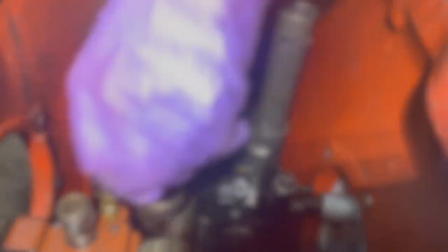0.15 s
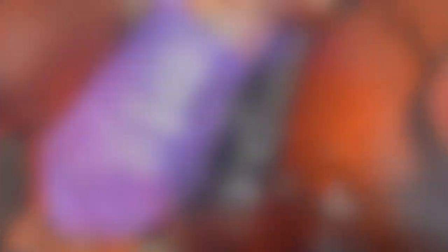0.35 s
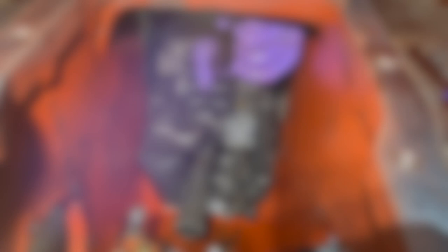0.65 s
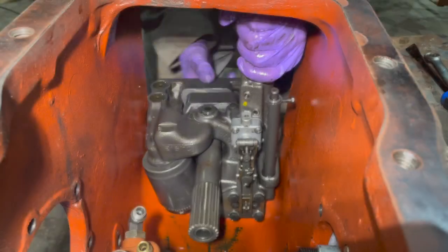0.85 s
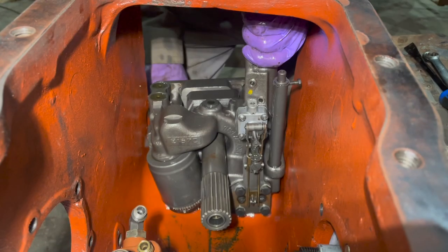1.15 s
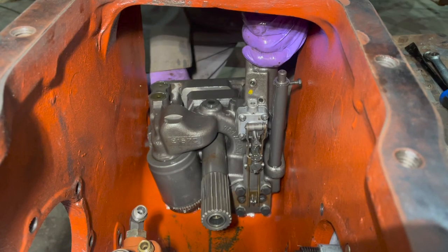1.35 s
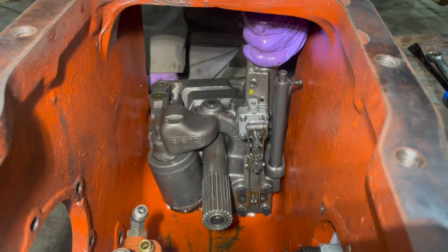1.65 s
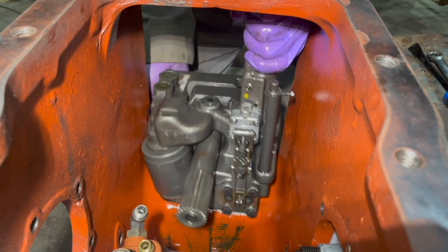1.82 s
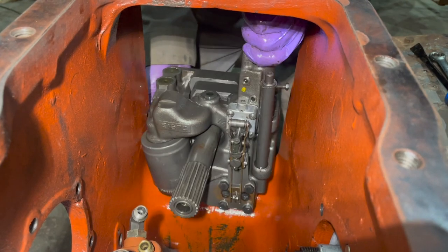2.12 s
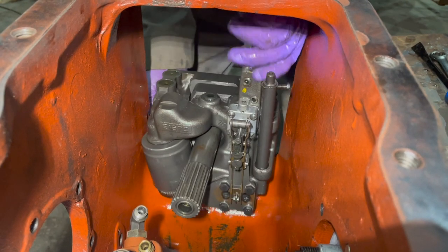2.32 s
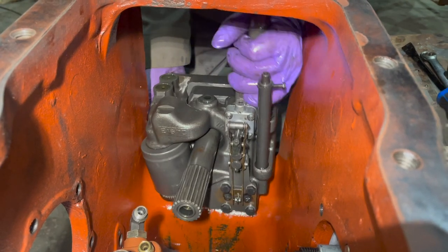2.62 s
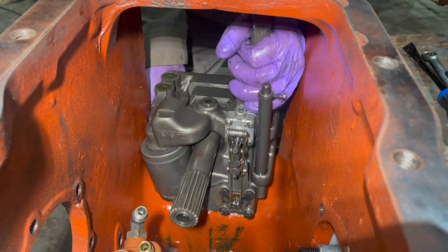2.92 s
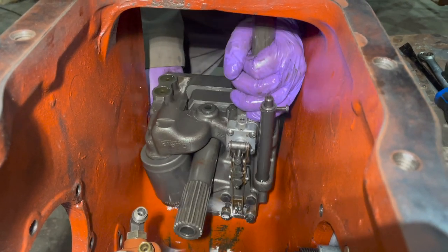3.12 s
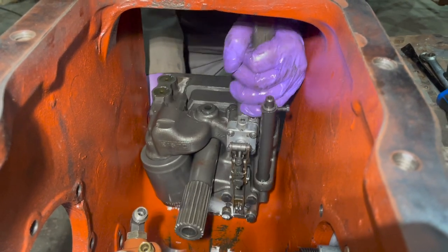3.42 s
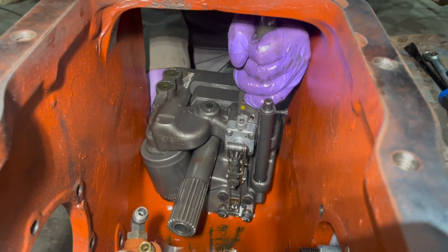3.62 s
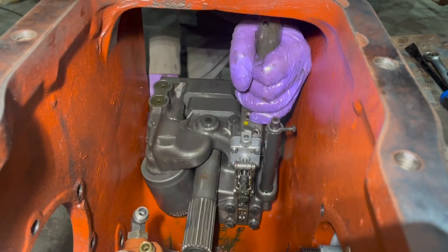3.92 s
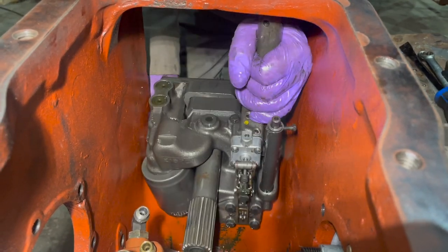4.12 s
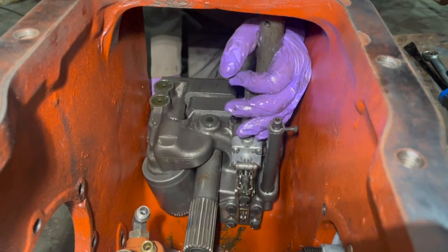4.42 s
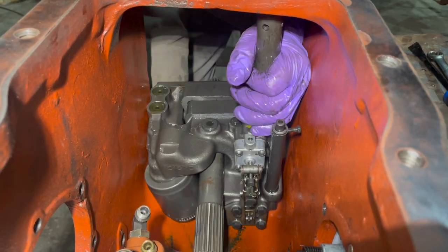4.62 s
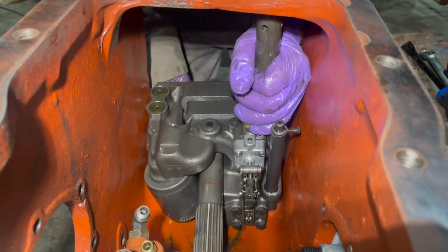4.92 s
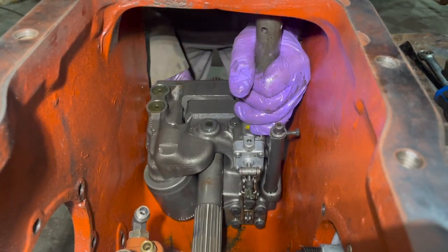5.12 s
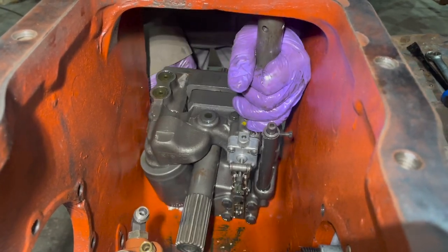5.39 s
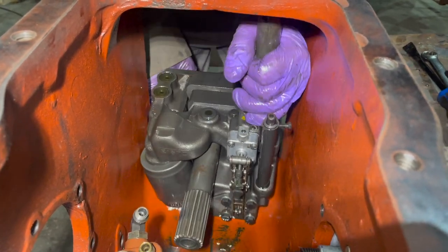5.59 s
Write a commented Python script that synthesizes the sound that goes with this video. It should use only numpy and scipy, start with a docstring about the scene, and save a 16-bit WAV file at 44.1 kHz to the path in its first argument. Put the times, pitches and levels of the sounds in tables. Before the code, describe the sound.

Close stereo microphones catch a heavy cast gear pump being rocked inside a steel housing in a workshop. Small knocks come in a quick cluster, then spaced clunks and clanks, the hardest near three and a half and just past five seconds. Gritty scuffs, glove rubbing and short rubber squeaks fill between, over a low drone and rumble with a short hall tail.

```python
"""Knocks of a heavy cast gear pump, rocked loose inside a steel housing in a workshop: damped modes of
casting and housing ring, under cracks of dying noise. Friction noise and grit make the scuffs, wavering
sines the rubber squeaks, coloured noise the rubbing gloves, the dragging casting, the housing's drone
and a low rumble that swells with some of the knocks. The hall adds a noise tail; two close microphone
ports differ in phase."""
import sys
import numpy as np
from scipy import signal
from scipy.fft import rfft, irfft, next_fast_len
from scipy.io import wavfile
from scipy.ndimage import uniform_filter1d

SR = 44100
rng = np.random.default_rng(int(sys.argv[2]) if len(sys.argv) > 2 else 0)


def int16_out(signal):
    """Quantize to a 16-bit WAV file."""
    q = np.round(np.clip(np.atleast_2d(signal).T, -1, 1) * 32767)
    wavfile.write(sys.argv[1], SR, q.astype(np.int16))


N = 253575

# Knocks. Each row: main touch in seconds, boom dB at 150 Hz, wall dB at 450 Hz, clunk dB at 750 Hz,
# ring dB at 1.5 kHz, clank dB at 2.8 kHz, favoured low mode in Hz, favoured high mode in Hz,
# left-right lean in dB, then any further raised or lowered modes as (Hz, dB).
KNOCKS = [(0.216, -35, -33, -37, -34, -44.5, 587, 1140, 4, (1356, 6), (599, 4)),
          (0.345, -29, -21, -24.5, -37.5, -39, 780, 1050, -4, (599, 4)),
          (0.401, -52, -30, -35, -40, -47, 540, 2512, -2),
          (.478, -17, -29, -12, -31, -35, 680, 1356, 11, (792, 7), (872, 8), (1742, 6), (3050, 6)),
          (.545, -36, -38, -29, -40, -47, 655, 1093, 8),
          (0.561, -29, -35, -31, -31, -48, 444, 1140, 3, (1138, 13), (998, -8), (1465, -6)),
          (0.685, -20, -17.5, -22, -30, -50, 790, 1150, 8, (444, 8), (680, 6), (599, -8), (872, 5)),
          (0.795, -45, -31, -38, -42, -57, 525, 956, 14),
          (.81, -32, -38.5, -60, -42, -48, 674, 1356, 16, (2775, 8)),
          (0.843, -41, -38, -55, -38, -37.5, 546, 2775, 4, (1356, 6), (1742, 6), (4240, 8), (3050, -8)),
          (1.099, -27, -18, -20, -21, -20.5, 607, 1470, 7.5, (1465, 8), (2085, -8), (2290, 5), (4240, 12),
          (4920, 6), (3768, -8), (792, -14), (1356, -8), (1138, -4), (860, 8), (1600, 6), (1742, -8),
          (2450, 8), (3050, 3), (3250, 6)),
          (1.522, -29.5, -22.5, -31.5, -18, -27, 603, 1460, 2.5, (1620, 8), (1465, 4), (1742, 8), (2450, 9),
          (1050, -6), (2085, -6), (2512, -6), (3250, 5)),
          (1.767, -19, -21, -5, -23.5, -19, 675, 998, 11.5, (792, 6), (1138, 8), (1356, 6), (880, 5),
          (1742, 6), (2450, 8), (3050, 6), (2085, -8)), (1.775, -40, -24, -12, -30, -34, 675, 1742, 8),
          (1.788, -40, -28, -26, -33, -50, 792, 880, 4, (1138, 6)),
          (1.859, -19.5, -19.5, -22, -30, -41, 790, 1142, 1, (1138, -6), (1356, 4), (2512, -6)),
          (1.951, -19.5, -27, -54, -48, -58, 570, 1050, -2),
          (2.035, -16.5, -31, -34, -48, -44, 513, 1136, 1),
          (2.179, -13, -17, -13, -22, -31, 680, 1030, -3, (467, 8), (220, 6), (379, -14), (1138, 5),
          (2085, 4)), (2.208, -20, -29.5, -45, -30, -35, 544, 1465, 12),
          (2.267, -27, -48, -39, -34, -43, 526, 1480, 6),
          (2.619, -20, -17.5, -11, -14, -20.5, 590, 1365, 9, (1356, 1), (379, -7), (792, 9), (1720, 5),
          (2290, 7), (2780, 8), (3290, 5), (2085, -8), (680, -10)),
          (2.678, -45, -45, -50, -43, -58, 680, 1356, 5), (2.797, -27, -43, -48, -61, -43, 600, 2512, 3),
          (2.861, -27, -29, -46.5, -51, -52, 680, 1340, 5),
          (3.112, -27.5, -43, -47, -51, -56, 680, 1356, -5),
          (3.443, -14.5, -7, -10.5, -18, -15, 680, 1145, 4, (998, 10), (2450, 6), (3265, 9), (792, 9),
          (467, 4), (2290, 6), (1535, 4), (2085, -6), (3768, 5), (4240, 3)),
          (3.61, -37, -56, -41, -47, -43, 680, 4240, -4, (2085, -8), (3768, 6), (6150, 8), (5146, 5)),
          (3.647, -25, -26, -30, -32, -20, 680, 3950, -4, (2085, -10), (2512, -5), (3050, -5), (3768, 10),
          (4240, 12), (5146, 12), (6150, 14), (7060, 12)),
          (3.654, -40, -40, -32, -28, -25, 792, 2775, -2, (2085, -10), (3413, 6), (3768, 8), (1465, 6)),
          (3.666, -40, -30, -30, -35, -36, 792, 1535, 0, (3768, 8), (5146, 8)),
          (3.839, -18, -19, -23, -26, -35, 544, 1330, 5.5, (444, -10), (830, 8), (2700, 6), (1465, -8),
          (2450, -8)), (4.433, -30, -43, -39, -47, -58, 600, 1535, 8),
          (4.606, -27, -46, -39, -51, -62, 613, 1000, 10), (4.743, -40, -42, -40, -50, -66, 792, 1138, 6),
          (4.829, -27, -35, -33, -45, -66, 550, 1000, 4, (998, 6), (1356, 4)),
          (5.172, -27, -18, -18, -19, -19, 700, 2520, 12, (1600, 8), (2450, 6), (2620, 8), (379, 8),
          (3768, 10), (4920, 8), (5600, 6)), (5.18, -14.5, -7.5, -13, -19, -18.5, 680, 1137, 2, (1010, 10),
          (1138, -2), (1610, 6), (2775, 6), (792, -6), (880, 6), (2620, 9), (3250, 7)),
          (5.259, -29, -30, -30, -40, -48.5, 590, 1000, 15),
          (5.388, -33, -38, -68, -55, -57, 520, 1350, 12), (5.487, -40, -38, -37, -43, -51, 792, 1356, 15),
          (5.523, -40, -49, -35, -40.5, -46.5, 544, 1170, 0)]
# Modes of casting and housing. Each row: frequency in Hz, level in dB, free t60 in seconds, left-right in dB.
BODY_MODES = [(71.6, -16, 0.4, 3.5), (97.95, -6.5, 0.96, -13.5), (130.7, 2, 0.22, 0), (183.5, 7.5, 0.5, 8),
              (220, 0, .55, -12), (298.2, -1, 0.17, -10), (378.6, -6, 0.49, 7), (444.4, -1, 0.5, 8),
              (467, 4, 0.23, -2.5), (544, 2.5, 0.018, -23), (599, 4, 0.07, 13.5), (679.6, 2, 0.088, 4),
              (792, -2.5, 0.095, 10), (872, -6, 0.05, 3), (998, -5, 0.089, 8), (1050, -3, .06, 0),
              (1138, -1, 0.12, 2), (1356, 2, 0.098, -6.5), (1465, -6, .05, 5), (1535, 0, 0.03, 5),
              (1610, -6, .04, 5), (1742, -6, 0.096, 7), (2085, 4.5, 0.02, -23), (2290, -1, .05, 0),
              (2376, -11.5, 0.08, -6), (2450, -1, .04, 5), (2512, 2, 0.053, -5.5), (2620, -2, 0.041, -8),
              (2775, -1, 0.04, 5), (3050, 2, 0.032, 18.5), (3265, -5, 0.05, -11.5), (3413, -10, .05, 3),
              (3768, -10, .05, 3), (3950, -8, 0.02, 0), (4240, -5.5, 0.04, 6), (4920, -8, .03, 3),
              (5146, -10, .05, 3), (5600, -8, 0.03, 0), (6150, -8, 0.035, 0), (7060, -10, .03, 0)]
# Share of a knock's lean that reaches each frequency. Each row: Hz, share.
LEAN_SHARE = [(70, .05), (200, 0.15), (450, 0.36), (700, 0.54), (1500, 0.43), (4000, 0.34), (7500, 0.42)]
# Dense modes heard as dying noise. Each row: Hz, t60 in seconds.
CRACK_T60_S = [(100, 0.13), (300, 0.063), (700, 0.13), (2500, .035), (11000, 0.07)]
# That noise against the knock's colour. Each row: Hz, dB.
CRACK_DB = [(150, -14.5), (300, 1), (450, -3.5), (700, -11), (1500, -9), (2000, -9), (3000, -7), (5000, -6),
            (11000, -6)]
# Scuffs, the part or a glove slipping a little. Each row: start in seconds, length in ms (to -20 dB),
# level in dB ahead of the low-pass, centre in Hz, width in octaves.
SCUFFS = [(.29, 112, -47, 2960, 2.4), (.345, 69, -43, 2100, 0.62), (.362, 30, -35.5, 3950, 0.55),
          (.399, 45, -46, 2000, 1.1), (.53, 40, -49, 2800, .9), (.635, 60, -46, 1500, 1.2),
          (.674, 25, -40, 1800, .6), (.795, 12, -46, 2500, 2.5), (.893, 15, -47, 2500, 1.2),
          (.86, 19, -43, 6030, 2.4), (1.50, 136, -49, 5860, 1.7), (1.675, 60, -53, 4500, 1.6),
          (1.692, 14, -46, 4200, 1.4), (1.75, 18, -47, 2200, .8), (1.856, 38, -42, 2800, 0.7),
          (1.856, 20, -47, 5000, .3), (2.14, 130, -45, 1450, 0.45), (2.18, 45, -36, 2050, 0.3),
          (2.268, 20, -41, 2500, 1.6), (2.335, 77, -33.5, 1990, 1.1), (2.796, 26, -37, 3600, 1),
          (2.80, 73, -42.5, 1230, 0.78), (3.102, 15, -47, 3000, 1.2), (3.112, 40, -39.5, 3760, 0.4),
          (3.11, 96, -38.5, 1020, 0.83), (3.24, 77, -55, 3000, 3.5), (3.355, 31, -46.5, 3950, 1.3),
          (3.47, 30, -40, 2800, .8), (3.405, 170, -46.5, 4720, 3.5), (3.555, 50, -52, 3200, 1.5),
          (3.606, 45, -39, 3600, 1.4), (3.649, 40, -30, 3600, 1.3), (3.76, 25, -46, 2000, 1.2),
          (3.845, 25, -40, 2500, 1.5), (3.788, 14, -39, 6500, 0.95), (4.33, 84, -40.5, 2920, 3.7),
          (4.46, 41, -47.5, 5000, 1.3), (4.51, 70, -48, 1000, .7), (4.64, 118, -45.5, 4350, 2.9),
          (4.70, 57, -50, 1500, 0.95), (5.215, 42, -47, 2800, 4.2), (5.488, 35, -40.5, 1370, 0.46)]
# Scuff hiss before its band-pass. Each row: Hz, dB per Hz.
FLAT_COLOUR = [(20, 0), (20000, 0)]
# Rubber on oily steel. Each row: start in seconds, level in dB before flicker, mean pitch in Hz, length in ms.
SQUEAKS = [(1.025, -53, 2800, 65), (2.22, -36, 3150, 40), (2.224, -50, 5600, 35), (2.335, -45, 3550, 18),
           (2.415, -50, 3600, 35), (.695, -52, 3800, 35), (.70, -50, 2500, 40), (1.696, -49, 4500, 20),
           (2.8, -47, 2500, 38), (3.118, -48, 3600, 45), (3.575, -55, 2400, 35), (4.188, -54, 2880, 65)]
# Gloves rubbing on the metal. Each row: time in seconds, level in dB.
RUB_LEVEL_DB = [(0, -54), (.2, -58), (.35, -55), (.46, -62.5), (.74, -66), (.8, -54), (.88, -53),
                (.93, -66), (1.1, -65), (1.3, -56), (1.55, -58), (1.62, -68), (1.7, -57), (1.8, -68),
                (1.95, -82), (2.16, -50), (2.44, -39), (2.51, -50), (2.59, -46), (2.68, -58), (2.77, -58),
                (2.93, -50), (2.98, -53), (3.03, -68), (3.2, -66), (3.3, -57), (3.4, -55), (3.46, -44),
                (3.5, -50), (3.54, -70), (3.6, -59), (3.76, -55.5), (3.9, -60), (4.0, -72), (4.2, -64),
                (4.4, -49), (4.55, -57), (4.68, -53), (4.82, -58), (4.95, -64.5), (5.12, -55), (5.26, -56),
                (5.33, -72), (5.49, -64), (5.65, -54)]
# Colour of the glove noise. Each row: Hz, relative dB per Hz.
RUB_COLOUR = [(700, -8), (2000, -7.5), (4000, -7), (6500, -5.5), (9000, -5.5), (12000, -14), (15700, -25)]
# The casting dragging on its seat. Each row: time in seconds, level in dB.
DRAG_LEVEL_DB = [(0, -48.5), (.6, -48), (.68, -36), (.78, -48), (2.1, -47), (2.2, -27.5), (2.4, -43.5),
                 (2.77, -47), (3.5, -52), (3.6, -50), (3.67, -31), (3.84, -50.5), (4.15, -50), (4.35, -47),
                 (5.75, -47.5)]
# Colour of the drag. Each row: Hz, relative dB per Hz.
DRAG_COLOUR = [(250, 5.5), (600, 14), (1200, 0), (2500, -3.5), (3500, -9), (6000, -27), (10000, -37)]
# Colour of the housing's drone. Each row: Hz, relative dB per Hz.
DRONE_COLOUR = [(76, -57.5), (130, -1.5), (326, -5.5), (352, -6), (427, -3.5), (480, -12.5), (603, -21),
                (693, -27.5), (1200, -32), (1560, -35), (2640, -120)]
# Low rumble that swells with some of the knocks. Each row: time in seconds, level in dB.
RUMBLE_LEVEL_DB = [(0, -35.5), (.27, -41.5), (.55, -48), (.69, -25), (.86, -32), (1.44, -35), (1.84, -37),
                   (2.22, -28), (2.47, -30.5), (3.0, -39), (3.14, -32), (3.7, -33), (3.83, -28.5),
                   (3.87, -25.5), (4.05, -33.5), (4.7, -33), (4.95, -39), (5.13, -38), (5.19, -17.5),
                   (5.35, -37.5), (5.75, -32.5)]
# Colour of the rumble. Each row: Hz, relative dB per Hz.
RUMBLE_COLOUR = [(15, -61), (25, -8), (53, -8), (64, 3.5), (124, -6), (178, -6), (199, -12.5), (220, -6.5),
                 (290, -49), (480, -120)]
# Decay of the hall. Each row: Hz, t60 in seconds.
HALL_T60_S = [(100, 0.84), (300, 0.81), (700, 0.19), (2000, 0.15), (6000, .12)]
# Strength of the hall's tail. Each row: Hz, dB.
HALL_DB = [(100, -4), (300, -5), (700, -23.5), (2000, -19.5), (6000, -12)]
# Correlation of noise between the ports. Each row: Hz, 0-1.
LIKENESS = [(30, .93), (80, 1), (200, 0.73), (660, 0.24), (1200, 0.2), (2200, 0.18), (4000, 0.71),
            (6800, 0.54), (7700, .999), (8900, 0.99), (9800, 0), (10800, .999), (12600, 0.8), (13300, 0.5),
            (14200, .999)]
# Phase lead of the left port. Each row: Hz, half turns.
PORT_LEAD = [(0, 0), (400, .15), (5000, .12), (6100, 0), (7050, -.45), (7700, -1), (8900, -1), (10800, -2),
             (12600, -2), (14200, -3), (22050, -3)]

THUD_DB = -1.5   # at 290 Hz, against the mean of boom and wall
EDGE_DB, TICK_DB = -17.5, -27   # at 5.5 and 11 kHz, against the stronger of ring and clank
FAVOUR_OCTAVES = .034   # reach of the struck point's favour around a mode
CONTACT_MS, BOUNCE = 5.2, .12   # chatter time; spread of its touches against the main one
GRAZE_MS, GRAZE_DB = 2.85, -17.5   # lead of a light graze; its stronger touch against the main one
SWELL_MS_PER_DB = .08   # a duller knock is softer: swell per dB that the clank lies under wall or clunk
# while the parts press together the upper modes are damped, then a share rings on freely
PRESSED_ABOVE_HZ, PRESSED_T60_S, PRESSED_BOOST_DB, FREE_SHARE = 950, .04, 2.5, .45
SLIP_TOP_HZ, SCUFF_RISE_SHARE, GRIT_PER_S = 8000, .07, 800
SQUEAK_WOBBLE_SHARE, SQUEAK_FLICKER_DB, SQUEAK_FADE_MS = .024, 4.5, 8
DRONE_REST_DB, DRONE_PER_BOOM_DB, DRONE_PER_WALL_DB = -47.5, -9, -16.5
DRONE_RISE_S, DRONE_T60_S = 0.023, 1.45
SQUEEZE_ABOVE_DB, SQUEEZE_SHARE, SQUEEZE_ATTACK_S = -25, 0.12, 0.026
DETECTOR_FALL_DB_PER_S = 38
LOW_CUT_HZ, STOP_HZ = 40.7, 15950


def amp(db):
    """Decibels to gain."""
    return 10 ** (np.asarray(db) / 20)


def in_time(rows):
    """A (seconds, value) curve, one value a sample."""
    s, value = np.transpose(rows)
    return np.interp(np.arange(N) / SR, s, value)


def at_hz(points, hz):
    """A spectrum read on a log-frequency axis."""
    point_hz, value = np.array(points).T
    return np.interp(np.log(hz), np.log(point_hz), value)


def unlike(hz):
    """Gain of the part that is each port's own."""
    return np.sqrt(1 - np.clip(at_hz(LIKENESS, hz), 0, 1))


def drift(corner_hz):
    """Slow chance of spread 1: noise through two equal poles, computed every 40 samples."""
    r = np.exp(-2 * np.pi * corner_hz * 40 / SR)
    slow = signal.lfilter([1], [1, -2 * r, r * r], rng.standard_normal(N // 40 + 2002))[2000:]
    return np.interp(np.arange(N) / 40, np.arange(len(slow)), slow / slow.std())


def bands(x):
    """Overlapping half-octave bands of x, with their centres in Hz."""
    size = x.shape[-1]
    spectrum = rfft(x)
    octave = np.log2(np.arange(1, size // 2 + 2) * SR / size)
    for hz in 44 * 2 ** np.arange(0, 9, .5):
        weight = np.clip(1 - 2 * abs(octave - np.log2(hz)), 0, 1)
        yield hz, irfft(spectrum * weight, size)


def stereo_noise(colour, grain_db, flicker_db):
    """Grainy noise of a given colour, correlated between the ports by LIKENESS; rms 1."""
    size = next_fast_len(N)
    hz = np.arange(1, size // 2 + 2) * SR / size
    grains = amp(grain_db * np.minimum(rng.exponential(1, size), 5))
    mid, side = rfft(grains * rng.standard_normal((2, size))) * amp(at_hz(colour, hz))
    outside = (hz < colour[0][0] / 2) | (hz > colour[-1][0] * 2)
    mid[outside] = 0
    side[mid == 0] = 0
    alike = np.clip(at_hz(LIKENESS, hz), 0, 1)
    ports = np.sqrt(1 + alike) * mid + np.sqrt(1 - alike) * side * [[1], [-1]]
    out = irfft(ports, size)[:, :N] * amp(flicker_db * drift(17.8))
    return out / out.std()


def swell(t, hz, rise_cycles=0.53):
    """A heavy contact is not instant: the onset takes a share of a cycle."""
    return 1 - np.exp(-(t * hz / rise_cycles) ** 2)


def mode_rings(t):
    """Complex decaying sines of all modes, the upper ones damped at first by the pressed contact."""
    hz, _, t60, _ = np.transpose(BODY_MODES)[:, :, None]
    rings = np.exp(2j * np.pi * hz * t) * amp(-60 * t / t60) * swell(t, hz)
    pressed = FREE_SHARE + (1 - FREE_SHARE) * amp(-60 * t / PRESSED_T60_S)
    rings[hz[:, 0] > PRESSED_ABOVE_HZ] *= amp(PRESSED_BOOST_DB) * pressed
    return rings


def contact():
    """Pulses of one knock at unit energy: two grazes, the main touch, six chance bounces; and the lead."""
    touches = np.zeros(int(CONTACT_MS * SR / 1000) + 2)
    later = abs(np.sin(9 * rng.standard_normal(6))) * (len(touches) - 1)
    touches[later.astype(int)] = BOUNCE * rng.standard_normal(6)
    touches[0] = 1
    graze = np.zeros(round(GRAZE_MS * SR / 1000))
    graze[[0, len(graze) // 2]] = amp(GRAZE_DB) * np.array([.5, 1])
    touches = np.concatenate([graze, touches])
    return touches / np.linalg.norm(touches), len(graze)


def knocks(modes_db=-9, scatter_db=2.0, favour_db=10.5, turn_rad=0.47):
    """Each chattering contact excites the modes by its colour and struck point, with a crack of noise."""
    hz, mode_db, _, lean_db = np.transpose(BODY_MODES)
    t = np.arange(SR) / SR
    rings = mode_rings(t)
    short = t[:6000]
    noise = [(f, b / b.std()) for f, b in bands(rng.standard_normal((3, SR)))]
    sides = np.array([[1], [-1]])

    def favour(f):
        return np.exp(-(np.log2(hz / f) / FAVOUR_OCTAVES) ** 2)

    out = np.zeros((2, N + 2 * SR))
    for s, boom, wall, clunk, ring, clank, low_hz, high_hz, pan_db, *further in KNOCKS:
        thud = (boom + wall) / 2 + THUD_DB
        edge, tick = max(ring, clank) + EDGE_DB, max(ring, clank) + TICK_DB
        colour = list(zip((150, 290, 450, 750, 1500, 2800, 5500, 11000),
                          (boom, thud, wall, clunk, ring, clank, edge, tick)))

        near = np.maximum(favour(low_hz), favour(high_hz))   # set by the point struck
        extra_db = sum(db * favour(f) for f, db in further)
        luck, turn_luck = rng.standard_normal((2, len(hz)))
        gain_db = at_hz(colour, hz) + mode_db + modes_db + extra_db + favour_db * near + scatter_db * luck
        side_db = (lean_db + pan_db * at_hz(LEAN_SHARE, hz)) / 2
        # each port hears another face
        turn = np.exp(1j * turn_rad * turn_luck * at_hz(LEAN_SHARE, hz) * sides)
        sound = ((np.sign(luck) * amp(gain_db + side_db * sides) * turn) @ rings).imag

        start = int(abs(np.sin(9 * rng.standard_normal())) * (SR - len(short)))
        for f, band in noise:
            dying = band[:, start:start + len(short)] * amp(-60 * short / at_hz(CRACK_T60_S, f))
            crack = dying[0] + unlike(f) * dying[1:]
            crack_db = at_hz(colour, f) + at_hz(CRACK_DB, f) + pan_db * at_hz(LEAN_SHARE, f) / 2 * sides
            sound[:, :len(short)] += amp(crack_db) * swell(short, f) * crack

        swell_ms = SWELL_MS_PER_DB * max(max(wall, clunk) - clank, 1)
        sound = sound * (1 - np.exp(-1000 * t / swell_ms))
        touches, lead = contact()
        sound = signal.fftconvolve(sound, touches[None])
        at = round(s * SR) - lead
        out[:, at:at + sound.shape[1]] += sound
    return out[:, :N]


def slips(rows, friction, rise_share):
    """Short bursts of friction noise in one band each; they swell fast and fade."""
    out = np.zeros((2, N))
    for s, ms, level_db, hz, octaves in rows:
        at, size = round(s * SR), round(ms * SR / 1000)
        share = np.arange(2 * size) / size
        shape = np.clip(share / rise_share, 0, 1) * np.exp(-2.3 * share ** 2)
        edges_hz = np.clip(hz * 2 ** (np.array([-.5, .5]) * octaves), 50, .45 * SR)
        band = signal.butter(2, edges_hz, "band", fs=SR, output="sos")
        burst = signal.sosfilt(band, friction[:, at:at + 2 * size])
        out[:, at:at + 2 * size] += amp(level_db) * shape * burst / burst.std()
    return signal.sosfilt(signal.butter(2, SLIP_TOP_HZ, fs=SR, output="sos"), out)


def scuffs(pan_db=2.5, ringing_db=-3.):
    """Friction hiss, and separate grains of grit that set the upper modes of the casting ringing."""
    t = np.arange(4096) / SR
    body = sum(np.sin(2 * np.pi * hz * t) * amp(-90 * t / t60) * (-1) ** k   # shorter than a free ring
               for k, (hz, _, t60, _) in enumerate(BODY_MODES) if hz > 500)
    hiss = stereo_noise(FLAT_COLOUR, grain_db=2.6, flicker_db=2.0)
    caught = rng.random(N) < GRIT_PER_S / SR
    grains = caught * rng.standard_normal(N) * amp(2.2 * np.minimum(rng.exponential(1, N), 4))
    ringing = signal.fftconvolve(grains, body)[:N]
    grit = hiss + amp(ringing_db) * ringing / ringing.std()
    return slips(SCUFFS, grit, SCUFF_RISE_SHARE) * amp([[pan_db / 2], [-pan_db / 2]])


def squeaks():
    """Slips so regular that they whistle: sines, alike in both ports, wavering in pitch and level."""
    out, t = np.zeros(N), np.arange(N) / SR
    warped_s = np.cumsum(1 + SQUEAK_WOBBLE_SHARE * drift(200.)) / SR
    flicker = amp(SQUEAK_FLICKER_DB * (drift(150.) - 1))
    for s, level_db, hz, ms in SQUEAKS:
        to_edge_ms = np.minimum(t - s, s + ms / 1000 - t) * 1000
        shape = np.clip(to_edge_ms / SQUEAK_FADE_MS + .5, 0, 1)
        out += amp(level_db) * shape * np.sin(2 * np.pi * hz * warped_s)
    return out * flicker


def glove_rub():
    """Rubber gloves on metal: broadband friction noise following the rub level."""
    return amp(in_time(RUB_LEVEL_DB)) * stereo_noise(RUB_COLOUR, grain_db=1.5, flicker_db=2.0)


def casting_drag():
    """The casting on its seat: duller friction noise following the drag level."""
    return amp(in_time(DRAG_LEVEL_DB)) * stereo_noise(DRAG_COLOUR, grain_db=1.5, flicker_db=2.0)


def hall(x):
    """The hall answers with a tail of noise, partly own in each port; the lows last longest."""
    t = np.arange(SR) / SR
    tail = 0
    for f, b in bands(rng.standard_normal((3, SR))):
        t60 = at_hz(HALL_T60_S, f)
        ports = b[0] + 1.37 * unlike(f) * b[1:]
        tail = tail + ports * amp(at_hz(HALL_DB, f) - 60 * t / t60) / np.sqrt(t60 * SR / 14)
    tail = tail * np.clip(t / 0.0093, 0, 1)   # builds up over the first reflections
    return signal.fftconvolve(x.mean(axis=0)[None], tail)[:, :N]


def drone(patchy_db=3.0):
    """A steady drone of the housing that every knock stirs up for a while; each band wavers on its own."""
    power = amp(2 * DRONE_REST_DB) * np.ones(N)
    for s, boom_db, wall_db, *_ in KNOCKS:
        stir = amp(2 * (boom_db + DRONE_PER_BOOM_DB)) + amp(2 * (wall_db + DRONE_PER_WALL_DB))
        t = np.maximum(np.arange(N) / SR - s, 0)
        power = power + stir * amp(-120 * t / DRONE_T60_S) * (1 - np.exp(-t / DRONE_RISE_S))
    noise = stereo_noise(DRONE_COLOUR, grain_db=0.4, flicker_db=1.2)
    wavering = sum(band * amp(patchy_db * drift(6.0)) for hz, band in bands(noise) if hz < 4000)
    return np.sqrt(power) * wavering


def low_rumble():
    """Low rumble that swells with some of the knocks: bass noise following the rumble level."""
    return amp(in_time(RUMBLE_LEVEL_DB)) * stereo_noise(RUMBLE_COLOUR, grain_db=-1.05, flicker_db=2.4)


def gain_control(x):
    """Level over the threshold is partly taken back, a little late, and released slowly."""
    level_db = 10 * np.log10(uniform_filter1d(np.mean(x ** 2, axis=0), size=441) + 1e-12)
    fall_db = DETECTOR_FALL_DB_PER_S * np.arange(N) / SR
    held_db = np.maximum.accumulate(level_db + fall_db) - fall_db
    over_db = np.maximum(held_db - SQUEEZE_ABOVE_DB, 0)
    r = np.exp(-1 / (SQUEEZE_ATTACK_S * SR))
    return x * amp(-SQUEEZE_SHARE * signal.lfilter([1 - r], [1, -r], over_db))


def scene():
    """Knocks, scuffs and squeaks with their hall tail, over rubbing, dragging and the low background."""
    hits = knocks() + scuffs() + squeaks()
    return hits + glove_rub() + casting_drag() + hall(hits) + drone() + low_rumble()


def record(dry):
    """Low cut, gain control, rounded peaks, phase between the ports, top cut."""
    dry = signal.sosfilt(signal.butter(5, LOW_CUT_HZ, "high", fs=SR, output="sos"), dry)
    dry = gain_control(dry)
    left, right = dry / (1 + (abs(dry) / .95) ** 4) ** .25
    size = next_fast_len(N + 4096)
    lead = np.interp(np.arange(size // 2 + 1) * SR / size, *np.transpose(PORT_LEAD))
    right = irfft(rfft(right, size) * np.exp(-1j * np.pi * lead), size)[:N]
    return signal.sosfilt(signal.cheby2(12, 60, STOP_HZ, fs=SR, output="sos"), [left, right])


dry = scene()
out = record(dry)
int16_out(out)
```